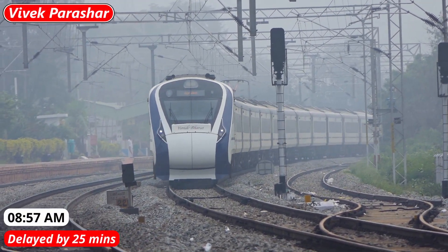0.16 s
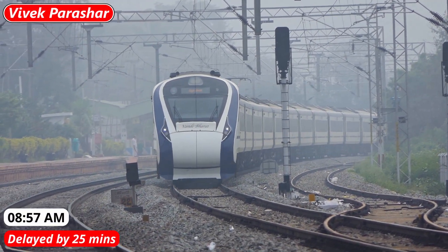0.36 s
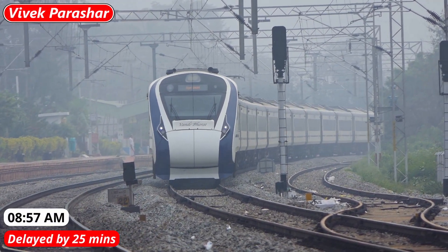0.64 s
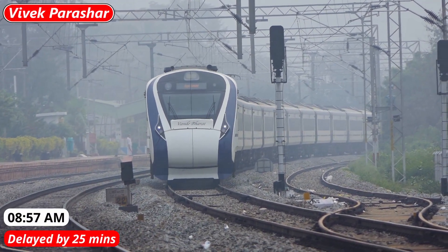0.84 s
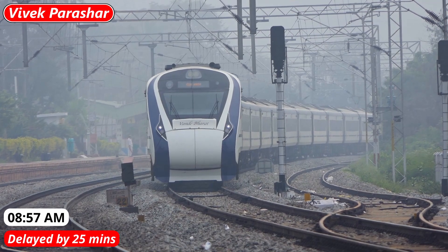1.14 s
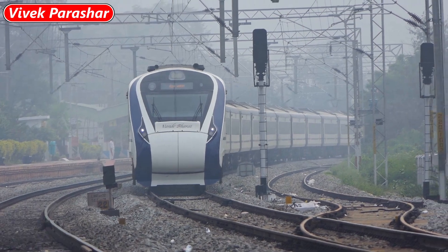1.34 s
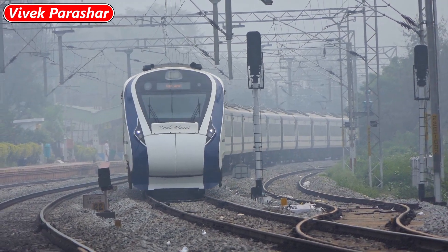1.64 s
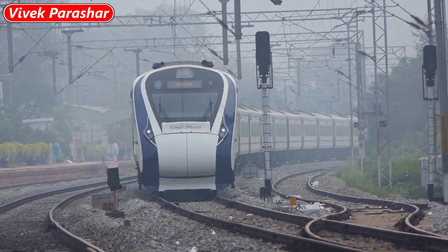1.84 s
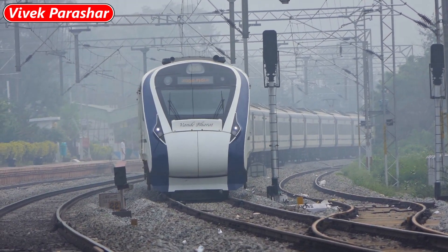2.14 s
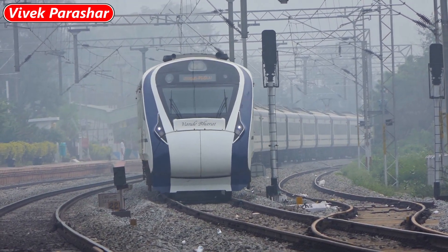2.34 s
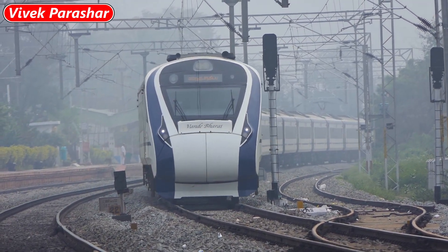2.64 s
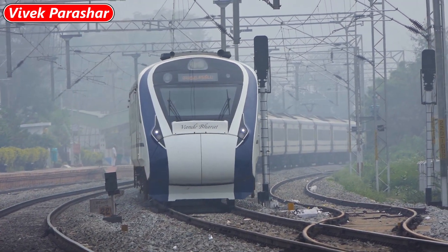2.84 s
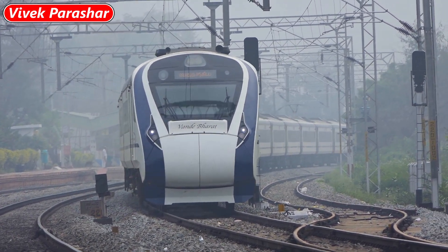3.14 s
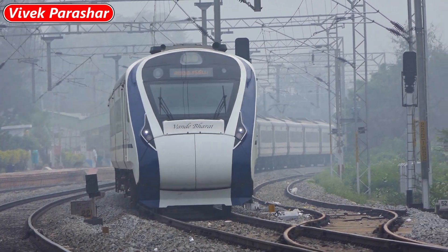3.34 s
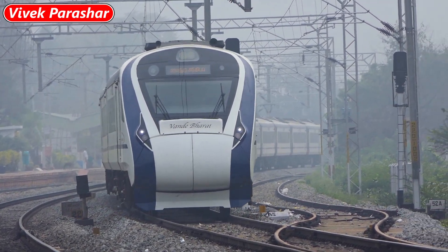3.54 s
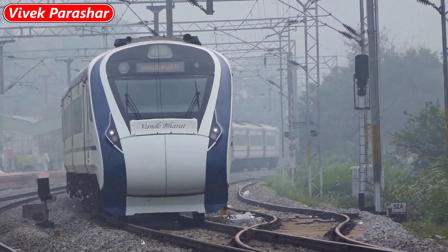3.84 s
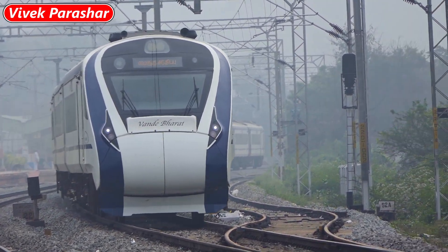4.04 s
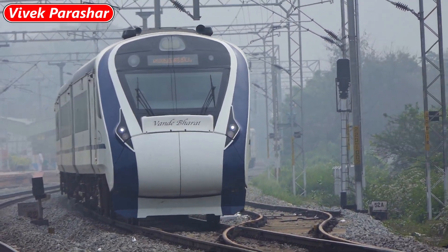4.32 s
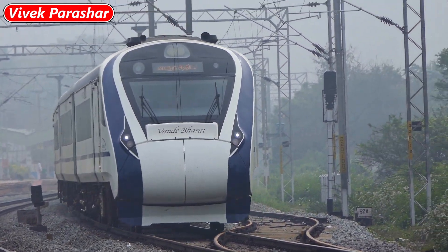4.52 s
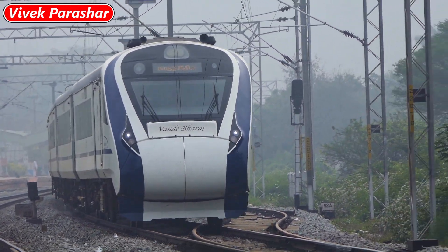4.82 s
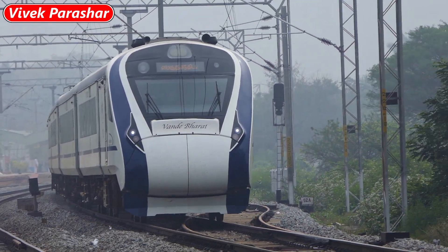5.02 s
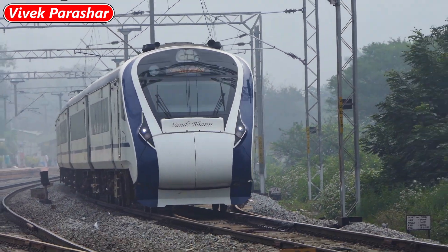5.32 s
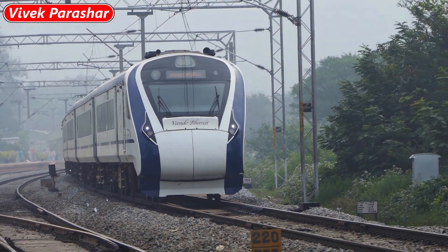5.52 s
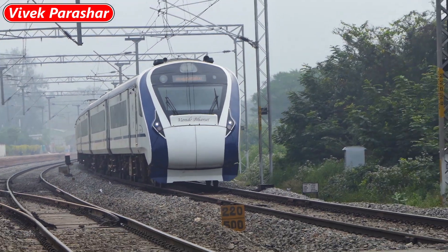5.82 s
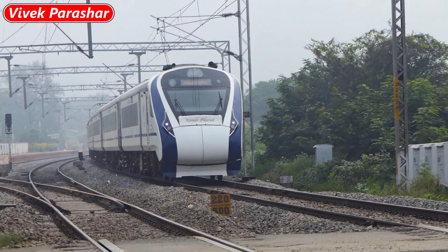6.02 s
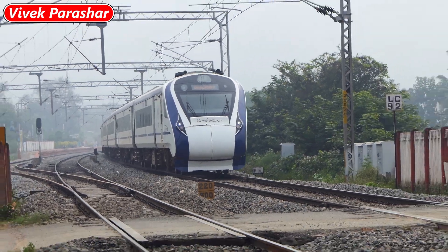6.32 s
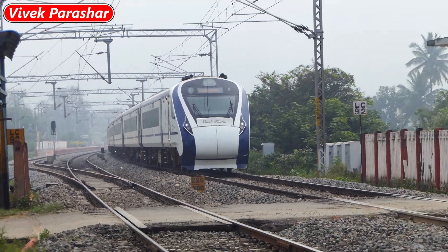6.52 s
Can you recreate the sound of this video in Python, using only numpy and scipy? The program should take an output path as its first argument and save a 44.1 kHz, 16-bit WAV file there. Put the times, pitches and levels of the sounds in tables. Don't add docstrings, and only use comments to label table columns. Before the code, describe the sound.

A fast electric train approaches outdoors along a curve. Almost at once its reedy, buzzing horn holds one steady note for over a second, then cuts off into a long open-air echo. Wheels rumble, hiss and knock over points with growing force. A brief squeak precedes a second, louder and longer blast on nearly the same note, burying the wheels. The microphone stands beside the track.

```python
import sys
import numpy as np
from scipy import signal
from scipy.fft import rfft, irfft, next_fast_len
from scipy.io import wavfile
from scipy.ndimage import uniform_filter1d, map_coordinates

SR = 44100
rng = np.random.default_rng(int(sys.argv[2]) if len(sys.argv) > 2 else 0)


def transcribe(signal):
    frames = np.atleast_2d(signal).T
    limited = np.clip(frames, -1, 1)
    pcm = np.round(limited * 32767).astype(np.int16)
    wavfile.write(sys.argv[1], SR, pcm)


def decibels_to_gain(level_db):
    exponent = np.asarray(level_db, float) / 20
    return 10 ** exponent


N = 294147
T_S = np.arange(N) / SR

# t/s, distance/m
DISTANCE_M = [(.2, 90), (1.45, 96), (4.85, 54.4), (5.15, 46.8), (5.6, 35.1), (5.85, 28.2), (6.1, 25.6),
              (6.4, 22.1), (6.9, 19.3)]
# t/s, weight on track bed/dB, flange bite on points/dB
ROLL_DB = [(0, -0.5, -2.5), (.25, 1.5, -6), (.6, -1.5, 5), (1.45, -6.5, 5), (2.3, -3, -9), (2.7, -3, -3),
           (3.25, 1, 2.5), (3.74, 2, 1), (3.95, 3.5, -7.5), (4.3, 0, -9.5), (4.78, 4, -10.5),
           (5.3, -2.5, 16), (6.7, -1.5, 16)]
# level/dB, share of weight, share of bite
ROLL_LAYERS = [
    (-48, 1.5, .01),
    (-47.5, 0.44, 0.31),
    (-51.5, .01, 0.95),
    (-67.5, 1.1, .01),
]
# f/Hz, density/dB
RUMBLE_SPECTRUM = [(12, -43), (20, -18), (102, 4), (157, 1), (232, -1), (276, -1), (372, -4), (403, -7.5),
                   (500, -7.5), (650, -34), (1100, -120)]
ROAR_SPECTRUM = [(240, -42), (400, -10), (475, -48), (601, -8.5), (803, 2.5), (1040, -9.5), (1120, 1),
                 (1190, -3), (1700, -3), (2120, -6), (2600, -20.5), (3380, -20), (5720, -120)]
HISS_SPECTRUM = [(1290, -9), (2200, -5.5), (2370, -7), (2730, -1.5), (3090, -5.5), (3680, -5), (4370, -6.5),
                 (5030, -6), (8000, -22.5), (10400, -34), (17600, -120)]
FIZZ_SPECTRUM = [(3530, -37), (6000, -1), (7410, -2.5), (7990, -8), (8710, 1.5), (10100, 0.5), (14400, -13),
                 (15500, -16.5)]
# f/Hz, likeness
PORT_LIKENESS = [(60, 0.54), (180, 0.87), (550, 0.8), (1650, 0.55), (4970, 0.88), (15000, 0.79)]
# f/Hz, left-right/dB
NOISE_BALANCE = [(60, -0.5), (180, 3.5), (550, 2.0), (1650, 3.5), (4970, 3.5), (15000, -2)]
# f/Hz, width/Hz, level/dB
WHINE_LINES = [(1660, 190, 4), (2730, 100, 0), (3190, 150, 4), (5300, 260, 2.5), (5560, 240, 0)]
# t/s, level/dB
WHINE_LEVEL = [(0, -63), (3.6, -66), (3.95, -59.5), (4.4, -58), (4.8, -58.5), (6.7, -70)]
# t/s, peak/dB, ring f/Hz, treble/dB, t60/s
JOINT_KNOCKS = [(2.665, -60, 1280, -19, 0.15), (2.728, -35, 1640, -18, 0.15), (2.821, -32, 760, -1, 0.16),
                (2.905, -35.5, 760, 7.5, 0.33), (3.028, -33, 857, -7, 0.2), (3.098, -27, 1830, -2, 0.38),
                (3.299, -37.5, 770, 10, 0.4), (3.398, -47, 781, -20, 0.15), (3.489, -26, 1740, -12, 0.14),
                (3.658, -25, 920, -12, 0.18), (3.792, -23, 1010, -47, 0.17), (3.886, -31, 1600, -5, 0.21),
                (3.966, -27, 1630, -24, 0.12), (4.016, -29.5, 1670, -34, 0.66),
                (4.108, -22, 1800, -17, 0.24), (4.191, -29, 1580, -37.5, 0.17)]
# t/s, peak/dB, f/Hz, t60/s
SLEEPER_THUMPS = [(1.984, -82, 202.7, 0.12), (2.173, -100, 285, 0.13), (2.351, -40, 183, 0.078),
                  (2.467, -41, 194, 0.13), (2.734, -41, 158, 0.1), (2.933, -38, 105, 0.093),
                  (3.128, -38, 107.6, 0.1), (3.225, -46, 178.5, 0.12), (3.319, -43.5, 195, 0.17),
                  (3.41, -34, 172, 0.1), (3.504, -39, 165, 0.14), (3.996, -38, 158, 0.14),
                  (4.125, -32, 149, 0.13), (4.334, -27, 106, 0.076), (4.42, -41, 202, 0.22),
                  (4.622, -40, 99, 0.11)]
# t/s, level/dB, f/Hz, width/Hz, t60/s
POINT_CLANK = (4.598, -38, 990, 90, .3)

# t/s, length/s, f/Hz, level/dB, swell over length/dB
SQUEALS = [
    (0.185, 0.06, 4350, -35.5, -3),
    (4.798, 0.049, 4360, -35.5, 1),
]
# multiple, far level/dB, close level/dB
SQUEAL_PARTIALS = [(0.502, -16, -4.5), (0.911, -4, -8), (0.998, 10, 6.5), (1.6, -38, -21), (2, -17, -8),
                   (2.5, -36, -24), (3, -50, -16)]
SQUEAL_ARCH, SQUEAL_EDGE = 0.0257, 0.15

# open t/s, shut t/s, f/Hz, pressure/dB, drift/(dB/s)
BLASTS = [
    (.232, 1.455, 400.3, -0.5, -8),
    (4.821, 6.692, 404.7, 4, -3.5),
]
# catch/s, brightness/(dB/octave), its drift/(dB/octave/s), pitch sag/(Hz/s)
VOICES = [
    (.011, -0.64, 0.59, 0.02),
    (.022, -4, 1.04, -0.65),
]
# multiple, level/dB
HORN_PARTIALS = [(1, -8.5), (2, 6.5), (3, 0), (4, 1), (5, -0.5), (6, -1.5), (7, -2), (8, -9), (9, -4),
                 (10, -5), (11, -3.5), (12, -7.5), (13, -10.5), (14, -6.5), (15, -6), (16, -15.5), (17, -7),
                 (18, -9.5), (19, -18), (20, -7.5), (21, -10), (22, -9), (23, -6.5), (24, -9.5), (25, -7.5),
                 (26, -17.5), (27, -13), (28, -14), (29, -19.5), (30, -18)]
HORN_TOP_DB, BASS_LAG_RAD = -1.5, 2.5
# f/Hz, density/dB
JET_SPECTRUM = [(550, -26), (900, -8), (1405, -3), (1440, 11), (1475, -3), (3500, -9), (7000, -20),
                (15000, -40)]
JET_DB = -49
ABSORB_DB_PER_KHZ = [-1, -0.05]
SHIMMER_DB = [.35, 1.5]
SCATTER = [.03, .1]
SKIRT, SKIRT_PER_S = .008, 260

SILENT_DB, CATCH_DB, FILL_S = -30.5, -7.5, 0.066
SHARP, SETTLE_S, KICK = .045, .058, 0.0503
DULL_DB, DULL_S, DULL_KICK_DB = -3, 0.07, -8.5
SHUT_DB, SHUT_S, BLEED_DB_PER_S, BLEED_S, CHOKE_DB_PER_S = -4.5, .012, -22, .135, -330
SHUT_DULL_DB, BLEED_DULL_DB_PER_S = -.8, -12
RUNAWAY_MS, RUNAWAY_S, TAIL_S = .5, .08, .26

HORN_M, MIC_M = 1.5, 1.2
GROUND, GROUND_HZ = 0.82, (750, 9000)
# f/Hz, left-right/dB
HORN_BALANCE = [(60, -20), (130, 0), (290, 2.5), (640, 3), (1410, -3), (3100, 1.5), (6820, 0.5),
                (15000, 2.5)]
# lag/s, level/dB, flat/(parts in 1000), f/Hz, width/octaves, left-right/dB
ECHOES = [(.05, -22, 0.375, 3500, 1.6, -15), (.2, -15, 1.559, 2200, 0.45, 15.5),
          (.325, -18.5, 3.5, 1770, 1.6, 0), (.27, -13, 0.15, 760, .6, 4.5), (.47, -23, 3, 2300, .9, -4),
          (.6, -23, 4.5, 1050, 0.5, 9)]
ECHO_DB = [-3.5, -2]
# f/Hz, t60/s
VALLEY_T60 = [(300, 3.4), (800, 2.34), (2000, 2.2), (5000, 1.46), (12000, 0.27)]
VALLEY_DB = -19.5
PATH_FLAT = [4.8, 14, 30]
PATH_DULL_DB_PER_KHZ = [0.1, -.5, -2]
LATE_S, LATE_DB = 1.45, -16


def evened(x):
    return x / np.sqrt(np.mean(x ** 2) + 1e-20)


def read(points, hz):
    f, value = np.transpose(points)
    return np.interp(np.log(hz + 1), np.log(f + 1), value)


def colour(x, gain):
    size = next_fast_len(x.shape[-1] + 2048)
    spectrum = rfft(x, size) * gain(np.fft.rfftfreq(size, 1 / SR))
    return irfft(spectrum, size)[..., :x.shape[-1]]


def add(mix, s, sound):
    part = mix[..., round(s * SR):][..., :sound.shape[-1]]
    part += sound[..., :part.shape[-1]]


def wander(size, per_s):
    knots = rng.standard_normal(int(size / SR * per_s) + 3)
    at = np.arange(0, size + 64, 64)
    return np.interp(np.arange(size), at, map_coordinates(knots, [at * per_s / SR], order=3))


def noise(points, patchy_db, flicker_db):
    frames, hz = N // 256 + 5, np.fft.rfftfreq(512, 1 / SR)
    a, b, c, d, patches = rng.standard_normal((frames, 257, 5)).T
    flicker = evened(uniform_filter1d(patches[0], size=4))
    patches = uniform_filter1d(patches, size=5, axis=0)
    patches = evened(uniform_filter1d(patches, size=10, axis=1))
    same = np.clip(read(PORT_LIKENESS, hz), -1, 1)[:, None]
    left = a + 1j * b
    right = same * left + np.sqrt(1 - same ** 2) * (c + 1j * d)
    z = np.array([left, right]) * decibels_to_gain(patchy_db * patches + flicker_db * flicker)
    x = signal.istft(z, window="cosine", nperseg=512, noverlap=256)[1][:, :N]

    def spectrum(f):
        return decibels_to_gain(read(points, f) + np.outer([.5, -.5], read(NOISE_BALANCE, f)))

    return evened(colour(x, spectrum))


def rolling():
    s, weight_db, bite_db = np.transpose(ROLL_DB)
    rumble, roar, hiss, fizz = (decibels_to_gain(np.interp(T_S, s, db + weight * weight_db + bite * bite_db))
                                for db, weight, bite in ROLL_LAYERS)
    out = rumble * noise(RUMBLE_SPECTRUM, patchy_db=-2.0, flicker_db=1.0)
    out += roar * noise(ROAR_SPECTRUM, patchy_db=2.0, flicker_db=-0.9)
    out += hiss * noise(HISS_SPECTRUM, patchy_db=1.8, flicker_db=1.3)
    out += fizz * noise(FIZZ_SPECTRUM, patchy_db=1.2, flicker_db=2.2)
    return out


def whines():
    def lines(f):
        return sum(decibels_to_gain(db) / (1 + ((f - hz) / (.3 * width)) ** 2) for hz, width, db in WHINE_LINES)

    level = decibels_to_gain(np.interp(T_S, *np.transpose(WHINE_LEVEL)))
    return level * evened(colour(rng.standard_normal(N), lines))


def knocks():
    out, t = np.zeros((2, N)), np.arange(SR // 2) / SR

    def burst(hz, width):
        x = rng.standard_normal(len(t))
        return evened(colour(x, lambda f: 1 / (1 + ((f - hz) / width) ** 2) ** 2))

    def shape(db, t60, rise_s):
        return decibels_to_gain(db - 60 * t / max(t60, .02)) * (1 - np.exp(-t / rise_s))

    for s, db, hz, treble_db, t60 in JOINT_KNOCKS:
        ring = burst(hz, 230) + decibels_to_gain(treble_db) * burst(3300, 4300)
        add(out, s, shape(db - 19.5, t60, 0.0021) * ring * decibels_to_gain([[1.5], [-1.5]]))
    s, db, hz, width, t60 = POINT_CLANK
    add(out, s, shape(db, t60, 0.015) * burst(hz, width))
    for s, db, hz, t60 in SLEEPER_THUMPS:
        thump = burst(hz, 45) + 0.24 * np.array([[1], [-1]]) * burst(hz, 47)
        add(out, s, shape(db + 9, t60, 0.027) * thump)
    return out


def squeal(length, top_hz, top_db, swell_db, shares_db, fade_db=160):
    age = np.arange(0, length, 1 / SR)
    u = age / length
    hz = top_hz * (1 - SQUEAL_ARCH * (1 - np.sin(np.pi * u)))
    jitter = 1 + 0.039 * rng.standard_normal(len(hz))
    turn = 2 * np.pi * np.cumsum(hz * jitter) / SR
    tone = np.zeros(len(hz))
    for (multiple, *_), db in zip(SQUEAL_PARTIALS, shares_db):
        tone += decibels_to_gain(db - fade_db * max(multiple - 1, 0) * age) * np.sin(multiple * turn)
    edges = signal.windows.tukey(len(hz), SQUEAL_EDGE)
    return np.sqrt(2) * decibels_to_gain(top_db + swell_db * u) * tone * edges


def valve(start, shut, top_hz, top_db, drift_db, catch, bright_db, brighten_db, sag_hz):
    age = np.arange(0, shut - start + TAIL_S, 1 / SR)
    before = np.clip(1 - age / catch, 0, 1)
    after = np.maximum(age - catch, 0)
    past = np.maximum(age + start - shut, 0)
    closed = np.minimum(past / SHUT_S, 1)
    hz = top_hz * (1 + SHARP * np.exp(-after / SETTLE_S) + KICK * before) + sag_hz * age
    pressure_db = top_db + drift_db * age + SILENT_DB * before + CATCH_DB * np.exp(-after / FILL_S)
    pressure_db += SHUT_DB * closed + BLEED_DB_PER_S * past
    pressure_db += CHOKE_DB_PER_S * np.maximum(past - BLEED_S, 0)
    metres = np.interp(start + age, *np.transpose(DISTANCE_M))
    lag_ms = 2000 * HORN_M * MIC_M / (343 * metres)
    lag_ms += RUNAWAY_MS * (1 - np.exp(-past / RUNAWAY_S))
    bright_db = bright_db + brighten_db * age + DULL_DB * np.exp(-after / DULL_S)
    bright_db += DULL_KICK_DB * before + SHUT_DULL_DB * closed + BLEED_DULL_DB_PER_S * past
    return hz, pressure_db, lag_ms, bright_db


def horn(controls, shimmer_db, scatter, wobble=.0004):
    hz, pressure_db, lag_ms, bright_db = controls
    size = len(hz)
    hz = hz * (1 + wobble * wander(size, per_s=50))
    k, db = np.transpose(HORN_PARTIALS)
    more = np.arange(1, 9)
    k, db = np.r_[k, k[-1] + more], np.r_[db, db[-1] + HORN_TOP_DB * more]
    circle = np.log(decibels_to_gain(np.r_[db[0] - 12, db, np.full(30, db[-1]), db[::-1]]))
    phase = -signal.hilbert(circle).imag[1:len(k) + 1] + BASS_LAG_RAD * np.exp(-k / 0.74)
    weights = decibels_to_gain(db) / np.sqrt(np.sum(decibels_to_gain(2 * db)) / 2) * np.exp(1j * phase)
    cycle = np.exp(2j * np.pi * np.cumsum(hz) / SR)
    lag = np.exp(-2j * np.pi * hz * lag_ms / 1000)
    octave = np.log(decibels_to_gain(bright_db)) / np.log(2)
    wave, late = np.ones(size), np.ones(size)
    plain, combed = np.zeros((2, size))
    for m, weight in zip(k, weights):
        wave, late, f = wave * cycle, late * lag, m * hz[-1]
        mirror = GROUND / (1 + (GROUND_HZ[0] / f) ** 3) / (1 + (f / GROUND_HZ[1]) ** 4)
        shimmer = decibels_to_gain(shimmer_db * np.sqrt(m / 10) * wander(size, per_s=7.87))
        partial = weight * wave * np.exp(octave * np.log(m / 2)) * shimmer
        plain += partial.real
        stray = scatter * m / 10 * (wander(size, per_s=45) + 1j * wander(size, per_s=45))
        stray += SKIRT * (wander(size, SKIRT_PER_S) + 1j * wander(size, SKIRT_PER_S))
        combed += (partial * (1 - mirror * late + stray)).real
    jet = evened(colour(rng.standard_normal(size), lambda f: decibels_to_gain(read(JET_SPECTRUM, f))))
    jet *= 1 + .9 * cycle.real
    edges = signal.windows.tukey(size, 400 / size)
    return edges * decibels_to_gain(pressure_db) * (np.array([plain, combed]) + decibels_to_gain(JET_DB) * jet)


def stretched(x, flat):
    return np.interp(np.arange(0, len(x), 1 - flat / 1000), np.arange(len(x)), x)


def valley(paths):
    out = np.zeros((2, N))
    for x in paths:
        hz, t, z = signal.stft(rng.standard_normal((2, 2 * SR)), SR, nperseg=512)
        z = z * decibels_to_gain(-60 * t / read(VALLEY_T60, hz)[:, None]) * np.clip(t / 0.021, 0, 1)
        tail = signal.istft(z + 0.54 * z[::-1], SR, nperseg=512)[1]
        tail = tail / np.linalg.norm(tail[0])
        share = wander(N, per_s=30.0) / np.sqrt(3)
        out += signal.fftconvolve((share * x)[None], tail, axes=1)[:, :N]
    return out


def blasts():
    far, out = np.zeros((3, N)), np.zeros((2, N))

    def ports(f):
        return decibels_to_gain(np.outer([.5, -.5], read(HORN_BALANCE, f)))

    for (s, *row), shares_db in zip(SQUEALS, np.transpose(SQUEAL_PARTIALS)[1:]):
        add(out, s, colour(squeal(*row, shares_db), ports))
    for row, voice, echo_db, absorb_db, *air in zip(BLASTS, VOICES, ECHO_DB, ABSORB_DB_PER_KHZ,
                                                    SHIMMER_DB, SCATTER):
        blast = horn(valve(*row, *voice), *air)
        plain, combed = colour(blast, lambda f: decibels_to_gain(absorb_db * f / 1000))
        add(out, row[0], colour(combed, ports))
        for path, flat, dull_db in zip(far, PATH_FLAT, PATH_DULL_DB_PER_KHZ):
            dulled = colour(stretched(plain, flat), lambda f: decibels_to_gain(echo_db + dull_db * f / 1000))
            add(path, row[0], dulled)
        for lag, db, flat, hz, octaves, pan_db in ECHOES:
            echo = colour(stretched(plain, flat),
                          lambda f: np.exp(-(np.log2((f + 1) / hz) / octaves) ** 2))
            add(out, row[0] + lag, decibels_to_gain(db + echo_db + np.array([[.5], [-.5]]) * pan_db) * echo)
    add(far[2], LATE_S, decibels_to_gain(LATE_DB) * far[2])
    return out + decibels_to_gain(VALLEY_DB) * valley(far)


def scene():
    return blasts() + rolling() + knocks() + whines()


def roll_off(x):
    return signal.sosfilt(signal.butter(12, 15660, fs=SR, output="sos"), x)


def record(dry, knee_db=-26, squeeze=0.73, fall_s=0.033, rise_s=0.28, creep=0.05):
    hop = 44
    power = uniform_filter1d((dry ** 2).mean(0), size=220)[::hop]
    power_db = 10 * np.log10(abs(power) + 1e-12)
    cut_db, state = np.zeros(len(power_db)), 0.
    for i, want in enumerate(squeeze * np.maximum(power_db - knee_db, 0)):
        state += (want - state) * min(0.0014 / (fall_s if want > state else rise_s), 1)
        cut_db[i] = state
    cut_db = cut_db + creep * signal.lfilter([.0012], [1, .0012 - 1], cut_db)
    gain_cut = decibels_to_gain(np.interp(np.arange(N), np.arange(len(cut_db)) * hop, cut_db))
    return roll_off(dry / gain_cut)


dry = scene()
out = record(dry)
transcribe(out)
```